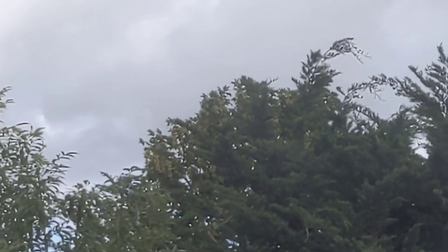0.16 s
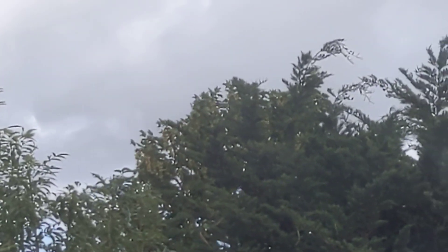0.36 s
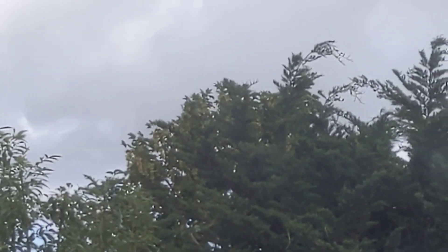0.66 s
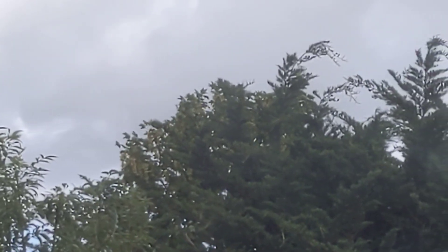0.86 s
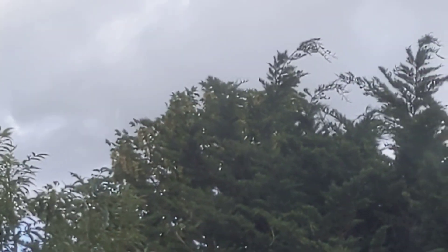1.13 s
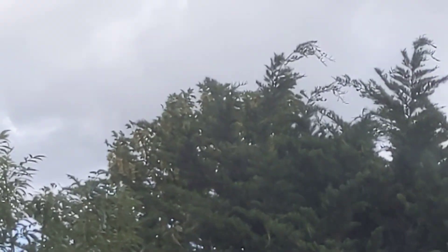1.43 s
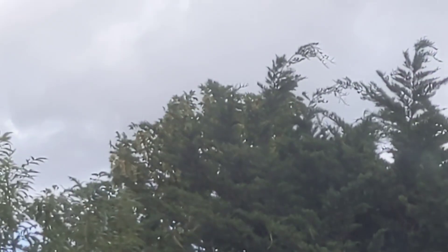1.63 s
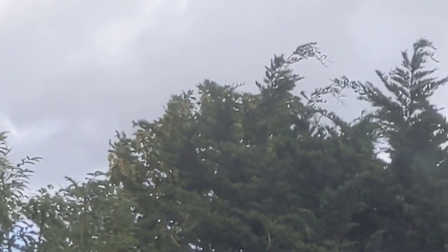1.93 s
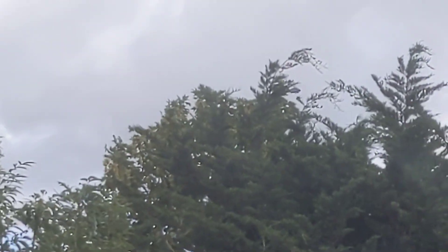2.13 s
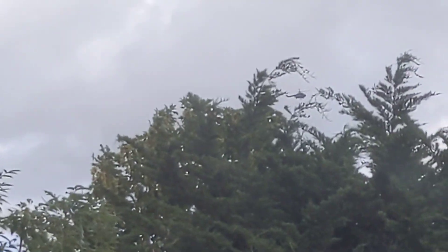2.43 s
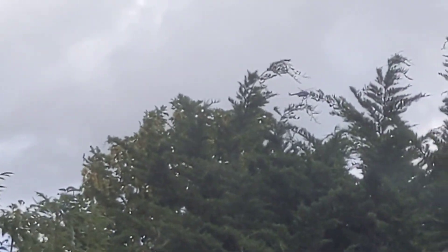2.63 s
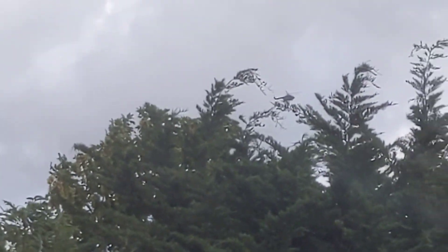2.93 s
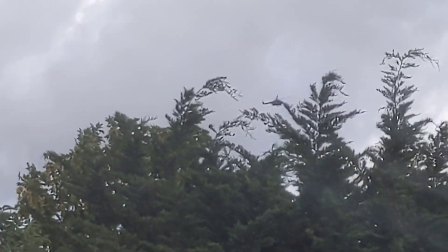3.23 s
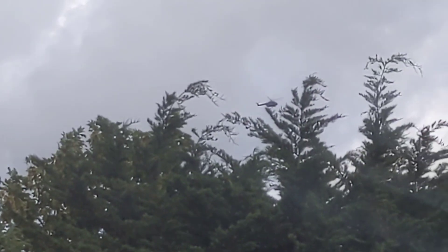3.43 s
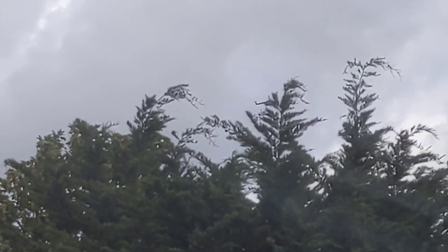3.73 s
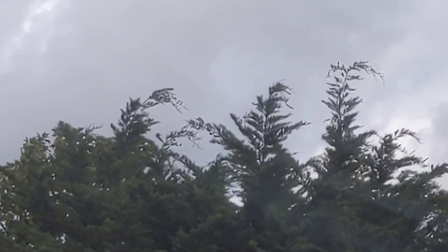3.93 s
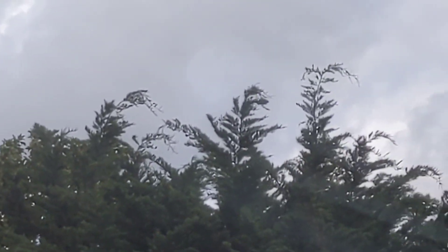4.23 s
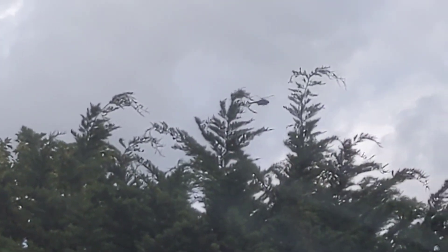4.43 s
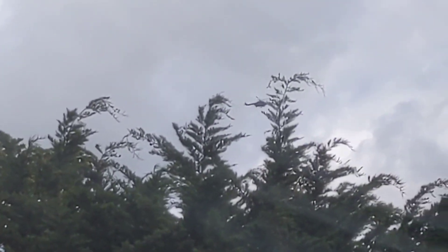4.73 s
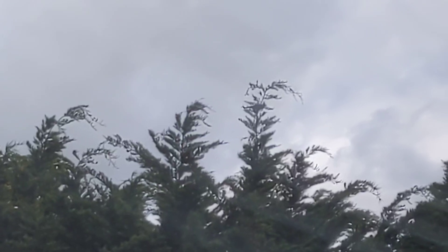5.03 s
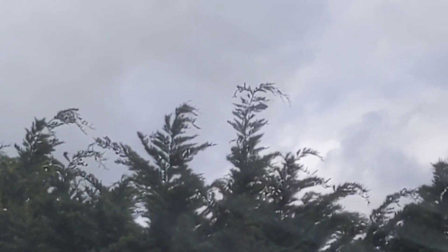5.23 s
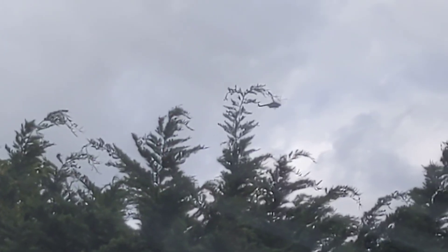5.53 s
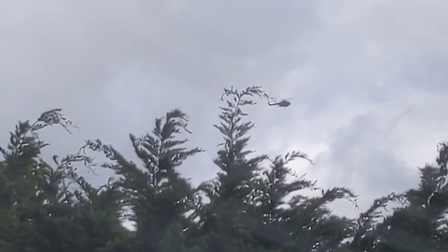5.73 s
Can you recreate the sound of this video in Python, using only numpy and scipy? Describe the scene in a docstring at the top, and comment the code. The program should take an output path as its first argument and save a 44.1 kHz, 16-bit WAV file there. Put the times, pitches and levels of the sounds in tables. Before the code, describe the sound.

Outdoors, a far helicopter gives a soft, low, wavering drone and dull roar, growing slightly brighter as it clears the trees. Fingers handle the camera beside its right microphone: a light bump at the start, a violent cluster of cracks at one second, then smaller clicks, thumps and scrapes near three and five seconds. Faint leafy hiss and tiny mechanical ticking lie beneath.

```python
"""Distant helicopter, fumbled camera

A helicopter drones past far behind trees: a stack of rotor tones that fade in and out over a dull roar of noise.
Fingers bump, tap and scrape the hand-held camera next to its right microphone: short blows ring the case, and
grainy noise makes the scrapes. Noise strokes brush the left microphone, and a small drive ticks in pairs.
Under it lies a hiss of leaves and microphone noise, with two thin whines and a faint squeak on the left."""
import sys
import numpy as np
from scipy import signal
from scipy.fft import rfft, irfft, next_fast_len
from scipy.io import wavfile
from scipy.ndimage import uniform_filter1d, map_coordinates

SR = 44100
rng = np.random.default_rng(int(sys.argv[2]) if len(sys.argv) > 2 else 0)


def digitize_waveform(pressure):
    """Quantize a signal to 16-bit integers and store it at the path in sys.argv[1].

    Rows of a 2-D input are taken as channels; values are limited to [-1, 1].
    """
    field = np.atleast_2d(pressure).T
    bounded = np.clip(field, -1, 1)
    quanta = np.round(bounded * 32767).astype(np.int16)
    wavfile.write(sys.argv[1], SR, quanta)


N = 258426

# Likeness of the two channels of a noise bed. Each row: frequency in Hz, correlation from 0 to 1.
CHANNEL_LIKENESS = [(60, 0.43), (130, 1), (290, 1), (500, 0.55), (800, 0.18), (1400, 0), (3000, 0)]

# Colour of the hiss. Each row: frequency in Hz, relative left level in dB, relative right level in dB.
HISS_COLOUR = [(1500, -9, 18), (2640, -2.5, 8.5), (4630, 4.5, 0.5), (5600, 4, 3.5), (7200, 0.5, -2.5),
               (8750, 0, -16), (10900, -5.5, -31), (14100, -17, -8), (15000, -24, -12), (15700, -28, -19)]
# Thin tones on the left. Each row: frequency in Hz, time of the level change in seconds,
# peak level before in dB, peak level after in dB.
WHINES = [(5023, 1.8, -77.5, -84.5), (13227, 2.15, -103, -88)]
SQUEAK_MIDDLE_S, SQUEAK_HALF_S, SQUEAK_PEAK_DB = 4.185, .03, -79
SQUEAK_START_HZ, SQUEAK_SAG = 13900, 190000  # the sag is in Hz per second squared

# Spells of drive ticking. Each row: first tick in seconds, number of tick pairs.
DRIVE_SPELLS = [(.467, 8), (1.507, 27), (3.987, 16)]
# Resonances of a tick, passed through twice. Each row: centre in Hz, width in Hz, gain per pass in dB.
TICK_MODES = [(4300, 1200, -3), (5700, 700, 0), (7000, 1200, -2), (14000, 3000, -10)]

# Ringing modes of the camera case. Each row: centre in Hz, width in Hz, relative gain in dB.
CASE_MODES = [(197, 155, 20), (395, 84, 3), (520, 92, 3), (740, 150, 1), (1270, 140, -9.5),
              (2250, 890, -4.5), (4430, 5100, -2.5)]
# Swing of the whole camera in the hand. The one row: centre in Hz, width in Hz.
HAND_SWING = (62.7, 21)
# Taps and bumps. Each row: start in seconds, push 1 or pull -1, knock peak in dB, contact decay in ms,
# boom peak in dB, frequency in Hz that the spot struck favours.
KNOCK_EVENTS = [(0.1136, -1, -22.5, 0.25, -27.5, 210), (1.015, -1, -21.5, 0.087, -42, 2100),
                (1.0278, -1, -22, 0.067, -19, 400), (1.031, -1, -15, 0.25, -22, 210),
                (1.0381, -1, 1.5, 0.26, -14, 260), (1.0419, -1, -0.5, 0.043, -33, 1260),
                (1.044, -1, -7, 0.049, -12, 1290), (1.0445, 1, -7.5, 0.39, -19, 386),
                (1.05, -1, -15.5, 0.53, -10, 210), (1.722, 1, -22, 0.15, -45, 516),
                (2.7574, 1, -12, 0.05, -48, 561), (2.774, -1, -39, 0.73, -22.5, 210),
                (2.788, 1, -31, 0.59, -19, 209.1), (2.829, 1, -20.5, 0.079, -41, 1330),
                (2.9518, 1, -23, 0.072, -40, 4500), (4.993, -1, -21.5, 0.066, -47, 2060),
                (5.004, -1, -18.5, 0.46, -17, 210), (5.243, 1, -41, 0.27, -22, 209.9),
                (5.249, 1, -19.5, .13, -41, 712), (5.2534, -1, -20, 0.12, -42, 715),
                (5.374, -1, -45, 0.51, -21.5, 210), (5.456, -1, -52, 0.38, -16, 210),
                (5.711, -1, -57, 0.48, -19, 210.6)]
# The mode nearest the struck spot rings more, those below it less.
SPOT_DB, BELOW_DB_PER_OCTAVE = 17, 3.5

# Grip shifts at the right microphone. Each row: start in seconds, length in seconds, level in dB.
GRIP_SHIFTS = [(.9, .16, -27.5), (1.28, 0.065, -38), (1.735, 0.02, -40), (2.75, 0.23, -33.5),
               (3.95, 0.12, -41.5), (4.5, .06, -40.5), (5.2, 0.38, -32.5)]
# Colour of the grip rumble. Each row: frequency in Hz, relative level in dB.
GRIP_COLOUR = [(20, -44), (36, -6), (48, 2), (65, 6.5), (110, -7), (200, -9), (400, -23), (900, -31),
               (3000, -74)]
STILL_HAND_DB, SHIFT_EDGE_S = -60.5, 0.026
# Finger scrapes at the right microphone. Each row: start in seconds, length in seconds, body level in dB,
# treble level over the body in dB.
FINGER_SCRAPES = [(1.016, 0.013, -33, -9), (1.029, 0.014, -24, -7.5), (1.045, 0.0049, -21, -13.5),
                  (1.045, 0.0493, -30, -13.5), (1.1, 0.011, -52, -15), (1.715, 0.051, -41.5, -37),
                  (2.757, 0.0052, -30.5, -11), (2.878, 0.044, -39.5, -28), (5, 0.0091, -30.5, -20.5),
                  (5.244, 0.012, -33, -8), (5.265, 0.22, -40.5, -21), (5.293, 0.016, -49, -3.5),
                  (5.363, 0.019, -41.5, -13.5), (5.452, 0.011, -38.5, -10.5)]
# Colour of a scrape's body. Each row: frequency in Hz, relative level in dB.
RASP_COLOUR = [(100, 7), (350, -1), (520, -9), (700, -1.5), (900, -5.5), (1150, -7.5), (1400, -11.5),
               (2200, -20.5), (4000, -53)]
# Colour of a scrape's treble. Each row: frequency in Hz, relative level in dB.
GRIT_COLOUR = [(900, -4.5), (1500, 11), (2400, 5), (4000, -2.5), (6500, -4), (8500, -26.5), (12000, -32),
               (15700, -35)]
# Brushes past the left microphone. Each row: start in seconds, length in seconds, level in dB.
LEFT_BRUSHES = [(1.715, 0.047, -56), (2.755, 0.15, -70), (2.878, .055, -58), (4.29, .015, -63),
                (4.543, 0.0083, -67)]
# Colour of a brush. Each row: frequency in Hz, relative level in dB.
BRUSH_COLOUR = [(300, -8), (1500, -2), (6000, -5.5), (12000, -11), (15700, -17)]
# Leak of handling noise through the air to the left. Each row: frequency in Hz, gain in dB.
AIR_LEAK = [(100, -37), (1000, -33), (6000, -25), (12000, -14.5)]

# The rotor on its way past. Each row: time in seconds, pitch in Hz, level of the fundamental in dB,
# level of its octave in dB, swell of the 280-450 Hz band in dB.
ROTOR_PATH = [(0, 62.15, -82, -49, 0), (.3, 63, -50, -42, -4), (.75, 62.55, -51, -48, -3),
              (1.25, 62.95, -44.5, -52, -2), (1.75, 63.23, -51, -67, -1), (2.05, 63.8, -54.5, -72, 1.5),
              (2.3, 63.4, -48.5, -56, 0), (2.55, 63.2, -45, -68, 2.5), (2.85, 63.1, -54, -52.5, -1),
              (3.3, 62.98, -50.5, -52, -1), (3.6, 62.57, -46, -44, 0.5), (4, 62.57, -47, -46, 3),
              (4.3, 62.6, -47.5, -42, -1), (5, 62.36, -46, -46, -0.5), (5.25, 62.43, -53, -41.5, 3.5),
              (5.5, 62.12, -50, -43, 2.5), (5.86, 62, -57, -51.5, 3.5)]
# Higher rotor tones. Each row: multiple of the pitch, base level at the start in dB, gain in dB per second,
# depth of slow fading in dB, dB per dB of fading of the fundamental (odd multiples) or octave (even ones),
# dB per dB of swell.
HIGHER_TONES = [(3, -57, 1.5, 4, 0.72, 1), (4, -60.5, 0, 9, 0.74, 0), (6, -69, 2.5, 3.67, 0.19, 2.5)]
FADES_PER_S = 3
CLEAR_DB = -43  # fundamental and octave when nothing fades them
# Colour of the low roar. Each row: frequency in Hz, relative left level in dB, relative right level in dB.
RUMBLE_COLOUR = [(20, -11, 0), (38, -14, -9), (54.8, 3.5, 7), (96.5, 0, 1.5), (151.6, 1.5, 0),
                 (258, -11.5, -12), (308, -4, -3.5), (350, -1, -2), (403, -2.5, -1), (526, -10, 2),
                 (582, -7, -4), (710, -53, -57)]
# Colour of the upper roar. Each row: frequency in Hz, relative left level in dB, relative right level in dB.
BODY_COLOUR = [(494, -32, -50), (604, -19, 3), (648, 4.5, 8), (709, 2, 0.5), (990, 0, 1.5),
               (1008, -3.5, -4), (1406, -8, -7), (1490, -15.5, -13), (1670, -13, -24), (2150, -22, -17),
               (2790, -24, -20), (3180, -30.5, -32), (4500, -41, -74)]
RUMBLE_DB, SWELL_BAND_DB = -50.5, -50  # outside the swelling band; inside it before the swell
BODY_START_DB, BODY_GAIN_DB_PER_S = -53.5, 0.6636

TOP_HZ = 15700  # band limit of the camera


def amp(db):
    """Gain of a level in dB."""
    return 10 ** (np.asarray(db) / 20)


def unit(x):
    """x at rms 1."""
    return x / np.sqrt(np.mean(x ** 2) + 1e-20)


def along(points, hz):
    """The columns of (Hz, value, ..) rows, read on a log frequency axis."""
    f, *columns = np.transpose(points)
    return np.array([np.interp(np.log(hz + 1), np.log(f + 1), c) for c in columns])


def curves(rows):
    """One value per sample for each column after the time."""
    s, *columns = np.transpose(rows)
    return [np.interp(np.arange(N) / SR, s, c) for c in columns]


def wobble(rate):
    """A smooth random curve with rate knots a second."""
    knots = rng.standard_normal(int(N * rate / SR) + 4)
    return map_coordinates(knots, [np.arange(N) * rate / SR])


def filtered(x, response):
    """x shaped by a complex response of frequency."""
    m = next_fast_len(x.shape[-1] + 8192)
    spectrum = rfft(x, m) * response(np.fft.rfftfreq(m, 1 / SR))
    return irfft(spectrum, m)[..., :x.shape[-1]]


def modes(rows):
    """Causal response of a bank of (Hz, width, dB) resonances."""
    return lambda f: sum(amp(db) * 1j * f * w / (c * c - f * f + 1j * f * w) for c, w, db in rows)


def noise(colour):
    """One channel of coloured noise at rms 1."""
    return unit(filtered(rng.standard_normal(N), lambda hz: amp(along(colour, hz)[0])))


def gain_field(shape, bins, frames):
    """Random gains over frequency and time, smoothed across bins and frames, at rms 1."""
    across = uniform_filter1d(rng.standard_normal(shape), bins, axis=0)
    return unit(uniform_filter1d(across, frames, axis=1))


def rush(colour, band, patchy_db, drift_db):
    """Stereo noise with quick patches and slowly drifting bands of gain; the left has rms 1 inside band."""
    z = signal.stft(rng.standard_normal((2, N)), nperseg=1024)[2]
    patches_db = patchy_db * gain_field(z.shape[1:], 6, 7)
    bands_db = drift_db * gain_field(z.shape[1:], 2, 45)
    pair = signal.istft(z * amp(patches_db + bands_db), nperseg=1024)[1][:, :N]

    def mid_side(hz):
        # this angle gives mid + side and mid - side the wanted correlation
        angle = np.arccos(np.clip(along(CHANNEL_LIKENESS, hz)[0], -1, 1)) / 2
        return np.array([np.cos(angle), np.sin(angle)])

    mid, side = filtered(pair, mid_side)
    both = filtered(np.array([mid + side, mid - side]), lambda hz: amp(along(colour, hz)))
    in_band = filtered(both[0], lambda hz: (hz > band[0]) & (hz < band[1]))
    return both / np.std(in_band)


def bursts(rows, edge):
    """Gain curve of (start, length, dB) strokes with a ramp up and an exponential tail."""
    t = np.arange(N) / SR
    gain = 0
    for s, length, db in rows:
        rise = np.clip((t - s) / edge, 0, 1)
        tail = np.exp(-np.clip(t - s - length, 0, None) / edge / 2)
        gain = gain + amp(db) * rise * tail
    return gain


def hiss():
    """Leaves and microphone noise as drifting noise, with thin sine whines and a falling squeak on the left."""
    t = np.arange(N) / SR
    whine = 0
    for hz, change_s, before_db, after_db in WHINES:
        change = np.clip((t - change_s) / .3 + .5, 0, 1)
        level_db = before_db + (after_db - before_db) * change + 1.5 * wobble(6)
        whine = whine + amp(level_db) * np.sin(2 * np.pi * hz * t + .4 * wobble(20))
    # the squeak's pitch falls ever faster from 4.13 s, then holds from 4.25 s
    squeak_hz = SQUEAK_START_HZ - SQUEAK_SAG * np.clip(t - 4.13, 0, .12) ** 2
    squeak_gain = amp(SQUEAK_PEAK_DB) * np.exp(-((t - SQUEAK_MIDDLE_S) / SQUEAK_HALF_S) ** 2)
    squeak = squeak_gain * np.sin(2 * np.pi * np.cumsum(squeak_hz) / SR)
    level_db = -73.0 + .6 * wobble(5)
    bed = amp(level_db) * rush(HISS_COLOUR, (3000, 15000), patchy_db=2.5, drift_db=3.0)
    return bed + (whine + squeak) * [[1], [0]]


def drive():
    """A click through resonances and its return 23 ms later, every 80 ms, close to the right microphone."""
    starts = np.concatenate([s + .08 * np.arange(pairs) for s, pairs in DRIVE_SPELLS])
    times = np.concatenate([starts, starts + .0228])
    kicks = np.zeros(N)
    kicks[np.round(times * SR).astype(int)] = amp(1.0 * rng.standard_normal(len(times)))
    ticks = unit(filtered(kicks, lambda f: modes(TICK_MODES)(f) ** 2))
    return amp(-78.5) * ticks * [[0], [1]]


def knocks():
    """A longer contact is a duller blow; each rings the case, most near its spot, and swings the camera."""
    out, t = np.zeros(N + SR), np.arange(SR // 5) / SR
    for s, way, knock_db, contact_ms, boom_db, spot_hz in KNOCK_EVENTS:
        blow = t ** 3 * np.exp(-1000 * t / max(contact_ms, .01))
        case = []
        for hz, width, db in CASE_MODES:
            spot_db = SPOT_DB * np.exp(-(np.log(hz / spot_hz) / .18) ** 2)
            below_db = BELOW_DB_PER_OCTAVE * np.clip(np.log2(spot_hz / hz), 0, 2)
            case.append((hz, width, db + spot_db - below_db))
        knock = filtered(blow, modes(case))
        boom = filtered(blow, modes([(*HAND_SWING, 0)]))
        hit = amp(knock_db) * knock / abs(knock).max() + amp(boom_db) * boom / abs(boom).max()
        out[round(s * SR):][:len(t)] += np.sign(way) * hit
    return out[:N]


def fingers():
    """Grip rumble, knocks and grainy scrapes on the right leak faintly through the air to the brushed left."""
    grip_gain = amp(STILL_HAND_DB) + bursts(GRIP_SHIFTS, edge=SHIFT_EDGE_S)
    grip = grip_gain * amp(1.7 * wobble(25)) * noise(GRIP_COLOUR)
    rasp_rows = [(s, length, db) for s, length, db, _ in FINGER_SCRAPES]
    grit_rows = [(s, length, db + treble_db) for s, length, db, treble_db in FINGER_SCRAPES]
    rasp = bursts(rasp_rows, edge=0.0013) * noise(RASP_COLOUR)
    grit = bursts(grit_rows, edge=0.0023) * noise(GRIT_COLOUR)
    grain = amp(2.2 * wobble(300))
    right = grip + (rasp + grit) * grain + knocks()
    leak = filtered(right, lambda hz: amp(along(AIR_LEAK, hz)[0]))
    brushes = bursts(LEFT_BRUSHES, edge=0.005) * noise(BRUSH_COLOUR)
    return np.array([leak + brushes, right])


def rotor_tones(hz, first_db, octave_db, swell_db):
    """Multiples of the rotor pitch twinkle in moving air: level and phase wander, phase more on high multiples."""
    t = np.arange(N) / SR
    levels = [(1, first_db), (2, octave_db)]
    for k, start_db, per_s, fade_depth_db, follow, swell_share in HIGHER_TONES:
        parent_db = first_db if k % 2 else octave_db
        slow_db = start_db + per_s * t + fade_depth_db * wobble(FADES_PER_S)
        levels.append((k, slow_db + follow * (parent_db - CLEAR_DB) + swell_share * swell_db))
    phase = 2 * np.pi * np.cumsum(hz) / SR
    tones = 0
    for k, db in levels:
        gain = np.sqrt(2) * amp(db + 1.5 * wobble(12))  # the root makes it an rms level
        tones = tones + gain * np.cos(k * phase + .03 * k * k * wobble(14))
    return tones


def roar(swell_db):
    """Low and upper noise come in drifting patches; the band at 280-450 Hz swells and sinks by itself."""
    t = np.arange(N) / SR
    rumble = rush(RUMBLE_COLOUR, (300, 460), patchy_db=1.1, drift_db=1.3)
    outside = filtered(rumble, lambda f: (f < 280) | (f > 450))
    low = amp(RUMBLE_DB) * outside + amp(SWELL_BAND_DB + swell_db) * (rumble - outside)
    body_db = BODY_START_DB + BODY_GAIN_DB_PER_S * t + 0.47 * wobble(4.74)
    body = amp(body_db) * rush(BODY_COLOUR, (600, 3000), patchy_db=1.1, drift_db=1.2)
    clear = np.clip((t - 2.5) / 2, 0, 1)  # clear of the trees the roar turns brighter
    return low + body + .5 * clear * filtered(body, lambda f: (f > 1450) * (f < 2300))


def helicopter():
    """Rotor tones and roar reach the left microphone 13 samples before the right."""
    hz, first_db, octave_db, swell_db = curves(ROTOR_PATH)
    tones = rotor_tones(hz, first_db, octave_db, swell_db)
    left, right = tones * amp([[0], [-.6]]) + roar(swell_db)
    return np.array([left, np.pad(right, (13, 0), mode="edge")[:N]])


def scene():
    """All sources at the two microphones."""
    return hiss() + drive() + fingers() + helicopter()


def record(dry):
    """The camera cuts the deep bass, rounds off the highest peaks and keeps nothing above its band limit."""
    x = filtered(dry, lambda hz: (1j * hz / (26 + 1j * hz)) ** 3)
    x = x / (1 + abs(x / .95) ** 6) ** (1 / 6)
    return filtered(x, lambda hz: hz < TOP_HZ)


dry = scene()
out = record(dry)
digitize_waveform(out)
```